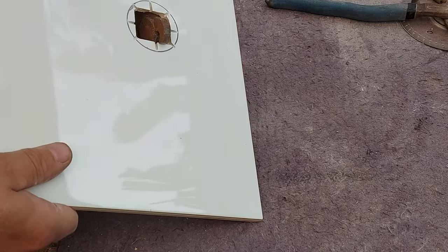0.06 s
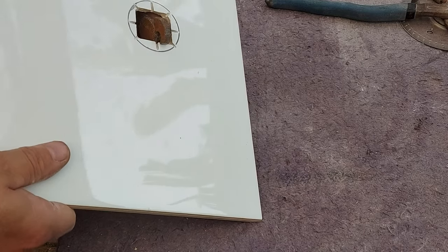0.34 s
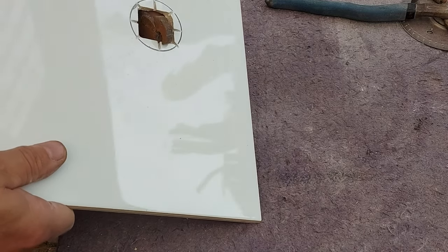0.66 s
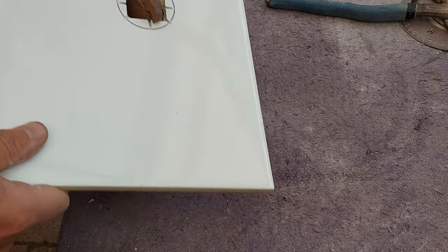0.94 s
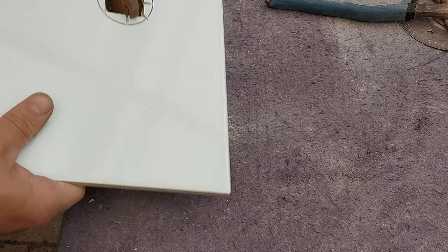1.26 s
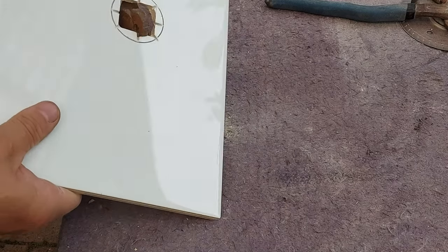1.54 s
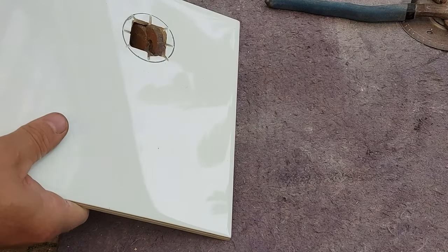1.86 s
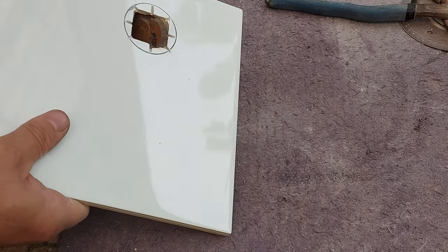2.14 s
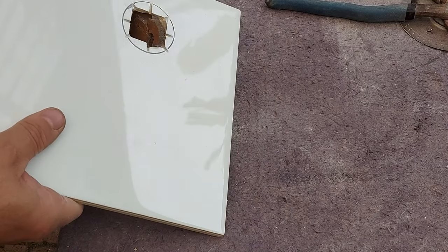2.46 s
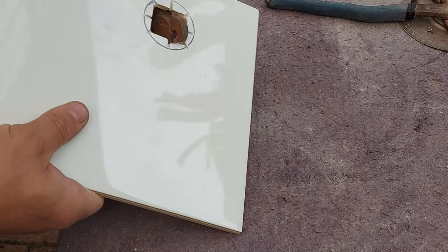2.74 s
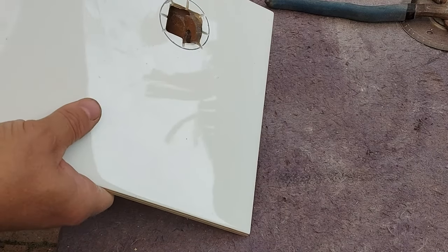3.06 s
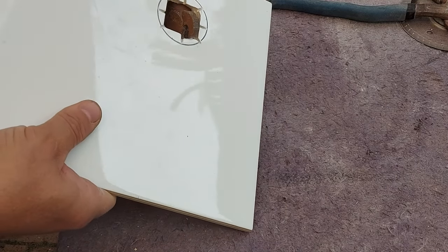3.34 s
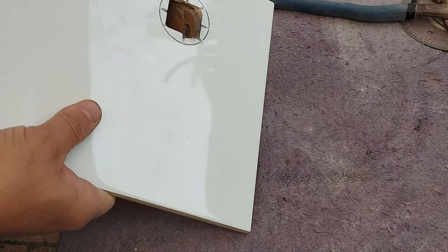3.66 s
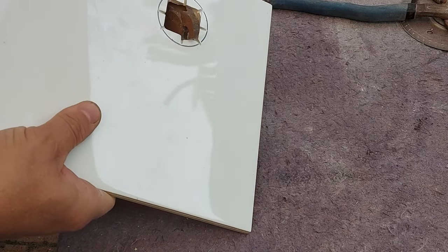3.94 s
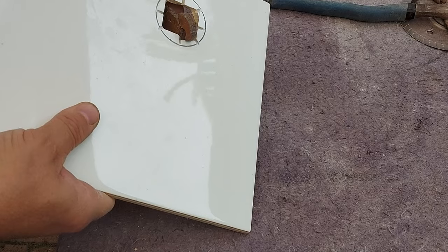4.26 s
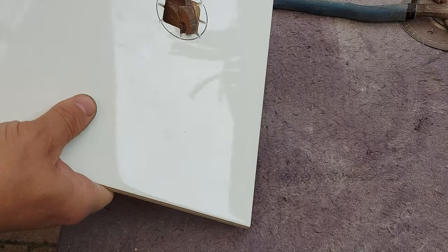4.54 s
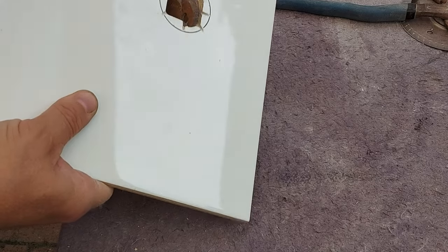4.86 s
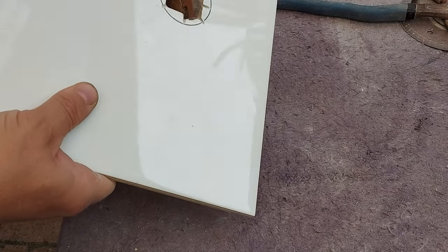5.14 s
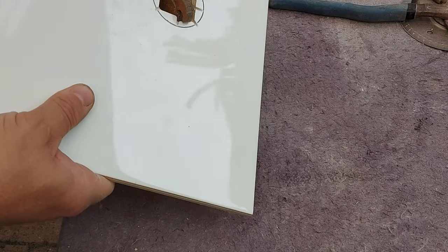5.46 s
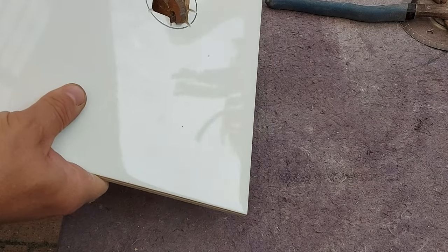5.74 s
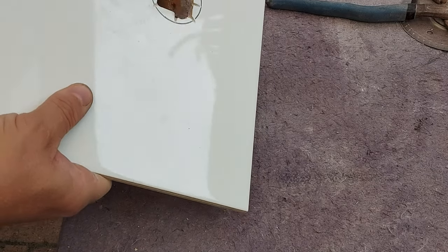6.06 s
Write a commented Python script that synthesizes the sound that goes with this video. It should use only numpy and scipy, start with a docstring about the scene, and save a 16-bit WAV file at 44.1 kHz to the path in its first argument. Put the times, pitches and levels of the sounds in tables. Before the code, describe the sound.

In a small room, over a low, drifting machine hum, nippers bite three pieces off a hand-held ceramic tile close to the microphone. The first breaks early with a crunchy, brittle crack. Light clinking knocks and gritty scrapes follow as the jaws seek a hold on the edge. Near the end come two more sharp snaps about a second apart, the steel jaws clicking shut after each.

```python
"""A small room, a stereo microphone close to a glazed ceramic tile held in one hand.
Hand nippers bite three small pieces off it. The jaws grate and knock on the edge while they seek a grip;
the glaze ticks under the load, then the piece snaps off. Every contact rings the same tile.
Behind it lie room tone and the faint, drifting hum of distant machinery."""
import sys
import numpy as np
from scipy import signal
from scipy.fft import rfft, irfft
from scipy.io import wavfile
from scipy.ndimage import uniform_filter1d

SR = 44100
rng = np.random.default_rng(int(sys.argv[2]) if len(sys.argv) > 2 else 0)


def wrap_up_sound(samples):
    """Save the sound to the file named by the first command line argument, as 16-bit audio."""
    columns = np.atleast_2d(samples).T
    # keep every value between -1 and 1, then stretch to whole-number steps
    tamed = np.clip(columns, -1, 1)
    steps = np.round(tamed * 32767).astype(np.int16)
    wavfile.write(sys.argv[1], SR, steps)


N = 273012
BENDING_HZ = 1235  # the tile's main bending mode


def gain_of(db):
    """Decibels to amplitude."""
    return 10 ** (np.asarray(db) / 20)


def unit_rms(x):
    """Scales to rms 1."""
    return x / np.sqrt(np.mean(x ** 2) + 1e-20)


def read(points, hz):
    """Reads a table on a log-frequency axis."""
    table_hz, value = np.transpose(points)
    return np.interp(np.log(hz + 1), np.log(table_hz + 1), value)


def add(mix, start_s, sound):
    """Adds a stereo sound at its start time."""
    part = mix[:, max(round(start_s * SR), 0):][:, :sound.shape[1]]
    part += sound[:, :part.shape[1]]


def coloured(x, points):
    """Causal filter with the given (freq_hz, gain_db) spectrum."""
    size = x.shape[-1]
    log_gain = np.log(gain_of(read(points, abs(np.fft.fftfreq(2 * size, 1 / SR)))))
    kernel = np.fft.ifft(np.exp(np.conj(signal.hilbert(log_gain)))).real[:size]
    return signal.fftconvolve(x, kernel[None], axes=1)[:, :size]


# Room tone around the microphone: freq_hz, density_db
ROOM_TONE = [(15, -34), (25, -16), (108, -8), (212, -16.5), (301, -7), (516, -22.5), (840, -31.5),
             (1130, -34.5), (1790, -43), (2200, -37), (3920, -50), (4600, -48), (7110, -53.5), (12900, -50),
             (16000, -56.5)]
# How alike it is on left and right: freq_hz, correlation
ROOM_TONE_LIKENESS = [(60, 0.85), (150, 0.88), (400, 0.37), (1000, 0.45), (4000, 0.24)]


def room_tone(level_db=-53.5, patch_db=1.3):
    """Background rumble and hiss, nearly mono in the bass, drifting in patches."""
    frames, hz = N // 512 + 5, np.fft.rfftfreq(2048, 1 / SR)
    noise = rng.standard_normal((5, frames, len(hz)))
    left, unrelated = noise[0] + 1j * noise[1], noise[2] + 1j * noise[3]
    likeness = read(ROOM_TONE_LIKENESS, hz)
    right = likeness * left + np.sqrt(1 - likeness ** 2) * unrelated
    patches = uniform_filter1d(noise[4], size=16, axis=0)
    patches = unit_rms(uniform_filter1d(patches, size=8, axis=1))
    spectra = np.array([left, right]) * gain_of(read(ROOM_TONE, hz) + patch_db * patches)
    tone = signal.istft(spectra.transpose(0, 2, 1), nperseg=2048, noverlap=1536)[1][:, :N]
    return gain_of(level_db) * unit_rms(tone)


def wavering(hz, db):
    """A low tone whose level and phase wander a little."""
    level_drift, phase_drift = signal.resample(.15 * rng.standard_normal((2, N // 4000)), N, axis=1)
    phase = 2 * np.pi * np.cumsum(hz * np.ones(N)) / SR
    return np.sqrt(2) * gain_of(db) * ((1 + level_drift) * np.sin(phase) + phase_drift * np.cos(phase))


# Machine hum, far from the microphone: time_s, pitch_hz, level_db
HUM_DRIFT = [(0, 109.8, -51), (.55, 104, -66), (.95, 102.9, -62.5), (1.25, 102.5, -50.5), (2.6, 106.7, -58),
             (3.5, 102.8, -65), (4.9, 103.4, -58.5), (6.19, 120.1, -47.5)]
# Its brief swells: peak_s, half_length_s, pitch_hz, level_db
HUM_SURGES = [(3.153, 0.064, 80.4, -45), (4.084, 0.12, 111.8, -44)]


def machine_hum(fifth_db=-5):
    """Distant machinery drifts over a slowly fading undertone; each surge has a fifth above it."""
    t = np.arange(N) / SR
    time_s, pitch_hz, level_db = np.transpose(HUM_DRIFT)
    out = wavering(np.interp(t, time_s, pitch_hz), np.interp(t, time_s, level_db))
    out += wavering(hz=53, db=-62 - 1.32 * t)  # undertone
    for peak_s, half_length_s, hz, db in HUM_SURGES:
        swell = np.exp(-((t - peak_s) / half_length_s) ** 2)
        out += swell * (wavering(hz, db) + wavering(1.5 * hz, db + fifth_db))
    return out


def ringing_modes(hz, db, t60_s, spread_rad):
    """Dying modes at the two microphone ports; higher modes arrive out of step."""
    t = np.arange(SR // 3) / SR
    phase_gap = spread_rad * rng.standard_normal(hz.shape) * np.minimum(hz / 1200, 1)
    fade = gain_of(db) * np.exp(-np.log(1000) * t / t60_s)
    return np.array([(fade * np.sin(2 * np.pi * hz * t + side * phase_gap)).sum(0) for side in (-.5, .5)])


# Modes of the tile in the jaws, heard close: pitch_hz, level_db
TILE_MODES = [(265, -14), (525, -6.5), (700, 3), (765, -3), (980, -10.5), (1235, 1.5), (1490, -12),
              (1950, -4.5), (2190, -0.5), (2360, -3.5), (2600, -5.5), (3700, -19.5), (3930, 0.5),
              (5250, -12.5), (5760, -5), (6060, -2), (7000, -6), (7750, 2.5), (9060, 4.5), (10110, 6),
              (10980, 6.5), (11750, 6), (12200, 0), (13020, 7), (13870, -3), (15300, 2.5)]
# The brief clack of its many damped modes: freq_hz, level_db
TILE_CLACK = [(100, -30), (280, -4), (420, -8.5), (520, -1.5), (700, 3), (1500, -2), (2200, 3),
              (3300, -9.5), (4000, 1), (4600, -5.5), (7000, -2.5), (8200, -6.5), (9000, 5.5), (9700, -5),
              (12500, 1), (15500, -9)]


def tile_ring(grip, damping, clack_db, clack_t60_s, bending_db=0):
    """The tile's answer to one click; the grip shifts the low modes, the spot struck weights them all."""
    hz, db = np.transpose(TILE_MODES)[:, :, None]
    hz = hz * np.where(hz < 1400, grip ** (hz / BENDING_HZ), 1)
    hz = hz * (1 + .008 * (hz > 11000) * rng.standard_normal(hz.shape))  # top modes shift with the spot
    is_bending = abs(hz / grip / BENDING_HZ - 1) < .1
    spot_db = bending_db * is_bending + 2.1 * rng.standard_normal(hz.shape)
    t60_s = .1 * (hz / 700) ** -.1 / damping  # higher modes die sooner
    modes = ringing_modes(hz, db + spot_db, t60_s, spread_rad=1.0)
    t = np.arange(modes.shape[1]) / SR
    noise = rng.standard_normal((3, len(t)))  # shared, left, right
    burst = (noise[0] + 1.3 * noise[1:]) * np.exp(-np.log(1000) * t / clack_t60_s)
    return unit_rms(modes) + gain_of(clack_db) * unit_rms(coloured(burst, TILE_CLACK))


def softened(force, corner_hz):
    """A contact that lasts a while carries little force above its corner."""
    return signal.sosfilt(signal.butter(1, corner_hz, fs=SR, output="sos"), force)


def grit(length_s, per_s, first_click):
    """A first click, then a fading shower of tiny ones as grains give way."""
    progress = np.arange(SR // 6) / SR / length_s
    chance, size = rng.random(len(progress)), rng.standard_normal(len(progress))
    clicks = (chance < per_s / SR) * size * np.exp(-progress ** 2)
    clicks /= np.linalg.norm(clicks) + 1e-9
    clicks[0] += first_click
    return clicks


def contact(force, ring, body_db, clink_db, fizz_db, fizz_pan_db=0):
    """Force rings the tile, with a level each for the low body, middle clink and high fizz."""
    sound = signal.fftconvolve(ring, force[None], axes=1)[:, :ring.shape[1]]
    # the small plate moves little air in the bass
    sound = signal.sosfilt(signal.butter(2, 210, "high", fs=SR, output="sos"), sound)
    bands = []
    for db, hz, kind in (body_db, 1600, "low"), (clink_db, [1600, 6500], "band"), (fizz_db, 6500, "high"):
        band = signal.sosfilt(signal.butter(7, hz, kind, fs=SR, output="sos"), sound)
        bands.append(gain_of(db) * band / np.std(band[:, :SR // 40]))
    body, clink, fizz = bands
    return body + clink + fizz * gain_of([[fizz_pan_db / 2], [-fizz_pan_db / 2]])


def crumbs(level_db=-78, per_s=20, spread_db=4.5):
    """Loose crumbs tick faintly between jaw and edge all the while."""
    chance, size = rng.random(N), np.minimum(rng.exponential(1, N), 3)
    clicks = softened((chance < per_s / SR) * gain_of(spread_db * size), corner_hz=4000)
    ring = tile_ring(grip=.98, damping=2.2, clack_db=10, clack_t60_s=.02)
    return gain_of(level_db) * unit_rms(signal.oaconvolve(ring, clicks[None], axes=1)[:, :N])


# Jaws grating over the edge, close up: start_s, level_db, brightness_db, length_s
JAW_SCRAPES = [(0.005, -50, -4, 0.011), (0.089, -59.5, -0.5, 0.05), (0.728, -69, 4, 0.046),
               (1.269, -60.5, -0.5, 0.089), (1.652, -54.5, 0.5, 0.023), (2.014, -54, -3.5, 0.047),
               (2.341, -66, -4, 0.051), (2.537, -69.5, -19, 0.067), (2.71, -59.5, 1, 0.0059),
               (2.942, -54, -0.5, 0.021), (3.223, -59.5, -4.5, 0.053), (3.341, -53, -3, 0.016),
               (3.538, -65, -2, 0.051), (3.615, -60, -9.5, 0.025), (3.826, -54.5, 6, 0.019),
               (4.022, -55, -6, 0.039), (4.606, -59, 1, .08), (4.971, -54, -5, 0.022),
               (5.287, -53.5, -2, 0.036)]


def scrapes(slip_after_s=.098, slip_db=-13):
    """The jaws slide, crushing separate grains, then slip once more, more faintly."""
    out = np.zeros((2, N))
    for start_s, level_db, brightness_db, length_s in JAW_SCRAPES:
        for at_s, db in (start_s, level_db), (start_s + slip_after_s, level_db + slip_db):
            ring = tile_ring(grip=.99, damping=1.5, clack_db=-3, clack_t60_s=.03)
            force = softened(grit(length_s, per_s=670, first_click=.47), corner_hz=4000)
            add(out, at_s, contact(force, ring, db - 4.5 - brightness_db, db, db - 3.5 + brightness_db))
    return out


# Tile cracking by the microphone: start_s, level_db, brightness_db, crumble_s, left_over_right_db
TILE_CRACKS = [(1.057, -47.5, -1.5, .05, 2.5), (1.1206, -45.5, -2.5, .07, 1), (1.184, -47, -2.5, .06, 4.5),
               (1.322, -39.5, -1, .045, -2.5), (1.385, -43.5, -0.5, .02, 1), (1.405, -45.5, 1.5, .01, -1.5),
               (1.4139, -30.5, 0.5, .03, 4), (1.4203, -34.5, -1, 0.06, 5), (1.4592, -22, 1.5, .02, 2.5),
               (1.476, -26, -2.5, 0.0068, -0.5), (4.777, -45, -5.5, .015, 2), (4.799, -26.5, 0, .01, 12),
               (4.8049, -27.5, -2, .01, -14), (5.831, -46.5, -3, .04, -1), (5.859, -42.5, -3, 0.0071, -7.5),
               (5.8803, -26.5, 1.5, .025, -5), (5.891, -31.5, 8, 0.011, -8.5),
               (5.902, -32.5, 3.5, 0.007, 8)]


def cracks(reference_db=-30, reference_run_s=.0062, run_doubles_db=13):
    """Each fracture is a run of micro-cracks a few milliseconds long; the edge crumbles after it."""
    out = np.zeros((2, N))
    for start_s, level_db, brightness_db, crumble_s, left_over_right_db in TILE_CRACKS:
        excess_db = level_db - reference_db
        ring = tile_ring(grip=1, damping=.9, clack_db=5, clack_t60_s=.037)
        run = grit(reference_run_s * 2 ** (excess_db / run_doubles_db), per_s=1400, first_click=.98)
        crumble = gain_of(-2.5) * np.sqrt(crumble_s / .024) * grit(crumble_s, per_s=1600, first_click=0)
        # stronger cracks shake more of the whole tile
        body_db = level_db - 8.5 + .4647 * excess_db - brightness_db
        fizz_db = level_db - .1 + brightness_db
        add(out, start_s, contact(run + crumble, ring, body_db, level_db, fizz_db, left_over_right_db))
    return out


def machine_drone(start_s=1.1, end_s=3.16, fade_s=.1, hz_per_s=2.2, db_per_s=6):
    """A second, lower machine tone gathers speed and level, then stops."""
    t = np.arange(N) / SR
    running_s = np.clip(t, start_s, end_s) - start_s
    fade = np.clip(np.minimum(t - start_s, end_s - t) / fade_s, 0, 1)
    return fade * wavering(hz=68.3 + hz_per_s * running_s, db=-62 + db_per_s * running_s)


# Jaws knocking on the edge, close up: start_s, level_db, bending_hz, bending_db, hardness_hz
JAW_KNOCKS = [(1.488, -32.5, 1331, 15.5, 4640), (1.538, -46, 1252, 12, 2000), (1.715, -39.5, 1232, 7, 3530),
              (2.185, -49.5, 1210, 1, 1700), (2.2426, -31, 1248, 2.5, 1500), (2.411, -44, 1217, 0, 1960),
              (2.666, -52.5, 1280, -0.5, 3700), (3.848, -37, 1358, 0.5, 1600),
              (4.0624, -35.5, 1326, 1.5, 1997), (5.1624, -36.5, 1220, -2, 701),
              (5.335, -63, 1210, 8.5, 1700), (5.418, -41, 1332, -7, 1750), (5.915, -41, 1354, -3.5, 800),
              (6.168, -49.5, 1220, 5.5, 2570)]


def knocks(bounce_s=.0057, bounce_force=.22, treble_db_per_octave=11):
    """Steel jaws land on the edge with a short chatter and one small bounce; hard blows are brighter."""
    out = np.zeros((2, N))
    for start_s, level_db, bending_hz, bending_db, hardness_hz in JAW_KNOCKS:
        grip = bending_hz / BENDING_HZ
        ring = tile_ring(grip, damping=1, clack_db=-6, clack_t60_s=.05, bending_db=bending_db)
        force = grit(length_s=.01, per_s=1500, first_click=1.8)
        force[round(bounce_s * SR)] += bounce_force
        force = softened(softened(force, hardness_hz), hardness_hz)
        treble_db = level_db + treble_db_per_octave * np.log2(hardness_hz / 2000)
        add(out, start_s, contact(force, ring, level_db, treble_db - 9.5, treble_db - 20.5))
    return out


def squeak(peak_s=2.603, rise_s=.0085, fall_s=.012, pitch_hz=1249, level_db=-39.5, octave_db=-9.5):
    """A jaw sticks and slips on the glaze, locking unsteadily onto the bending mode for a moment."""
    t = np.arange(N) / SR - peak_s
    jitter = .012 * unit_rms(uniform_filter1d(rng.standard_normal(N), size=80))
    phase = 2 * np.pi * np.cumsum(pitch_hz * (1 + jitter)) / SR
    swell = np.exp(-np.minimum(abs(t) / np.where(t < 0, rise_s, fall_s), 20))
    tone = np.sin(phase) + gain_of(octave_db) * np.sin(2 * phase)
    return np.sqrt(2) * gain_of(level_db) * swell * tone


# Jaws springing shut by the microphone once a piece is off: start_s, level_db
JAW_CLOSINGS = [(4.809, -32), (5.896, -24.5)]
# Modes of the steel nippers: pitch_hz, level_db, t60_s
STEEL_MODES = [(2880, -8, .16), (3660, -3, .12), (4080, -3, .19), (4160, -3, .14), (4230, -6, .12),
               (8930, -1, .13), (10110, -2, .13)]


def jaws_closing():
    """The freed jaws meet and ring longer than the hand-damped tile."""
    out = np.zeros((2, N))
    for start_s, level_db in JAW_CLOSINGS:
        ring = ringing_modes(*np.transpose(STEEL_MODES)[:, :, None], spread_rad=1.1)
        add(out, start_s, gain_of(level_db) * ring / np.std(ring[:, :SR // 40]))
    return out


# Decay of the small room: freq_hz, t60_s
ROOM_DECAY = [(200, 0.39), (800, 0.3), (2500, 0.24), (5000, .28), (9000, 0.22), (15000, 0.25)]
# Colour of its reflections at the microphone: freq_hz, gain_db
REFLECTION_COLOUR = [(200, 4), (800, 0.5), (3000, 6), (7000, 0.5), (12000, -6.5)]


def reflections(sound, build_s=.0072):
    """A short diffuse tail that builds up as reflections arrive and dies sooner in the treble."""
    hz, t, spectra = signal.stft(rng.standard_normal((2, SR // 2)), SR, nperseg=256)
    colour = gain_of(read(REFLECTION_COLOUR, hz))[:, None]
    decay = np.exp(-np.log(1000) * t / read(ROOM_DECAY, hz)[:, None])
    tail = signal.istft(spectra * colour * decay, SR, nperseg=256)[1]
    tail *= 1 - np.exp(-(np.arange(tail.shape[1]) / SR / build_s) ** 2)
    return signal.fftconvolve(sound, tail / np.linalg.norm(tail[0]), axes=1)[:, :N]


def scene():
    """The tile close by, the room around it, machinery in the distance."""
    breaking = cracks() + jaws_closing()
    knocking = knocks() + squeak()
    sliding = scrapes() + crumbs()
    direct = breaking + knocking + sliding
    direct[1] = np.roll(direct[1], 3)  # reaches the right port three samples later
    reflected = reflections(gain_of(-6.5) * breaking)
    reflected += reflections(gain_of(-10) * knocking + gain_of(-5.5) * sliding)
    return direct + reflected + machine_hum() + machine_drone() + room_tone()


# Response of the microphone's left and right ports: freq_hz, gain_db
MIC_LEFT = [(20, -16), (33, -9), (48, 3.5), (300, -5), (800, 2.5), (2400, 0.5), (4400, -2), (9000, 6),
            (12000, 7.5), (15000, -0.5)]
MIC_RIGHT = [(20, -16.5), (33, -15.5), (48, 3), (300, -4.5), (800, 0.43), (2400, -2), (4400, -3), (9000, 3),
             (12000, 6), (15000, 10)]


def record(dry):
    """The microphone colours each side, overloads softly on the loudest snaps and cuts the top treble."""
    hz = np.fft.rfftfreq(N, 1 / SR)
    response = gain_of([read(MIC_LEFT, hz), read(MIC_RIGHT, hz)])
    heard = irfft(rfft(dry) * response, N)
    lowpass = signal.firwin(255, cutoff=15850, window=("kaiser", 8), fs=SR)
    return signal.oaconvolve(np.tanh(heard), lowpass[None], "same")


dry = scene()
out = record(dry)
wrap_up_sound(out)
```